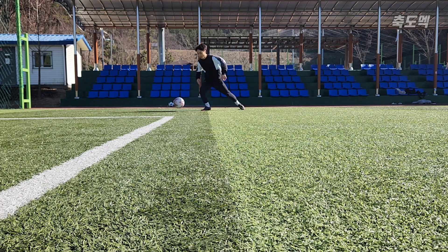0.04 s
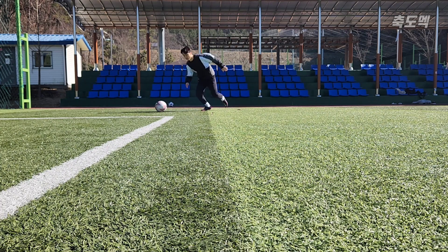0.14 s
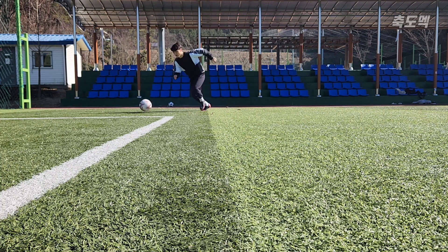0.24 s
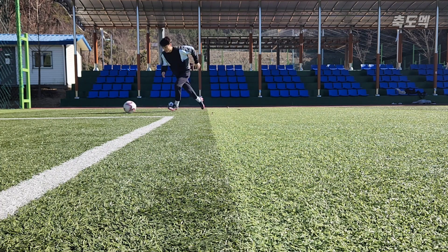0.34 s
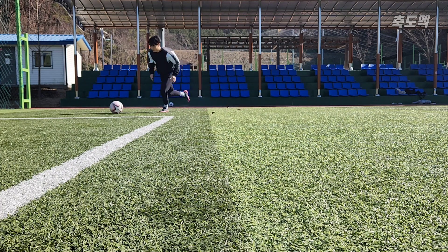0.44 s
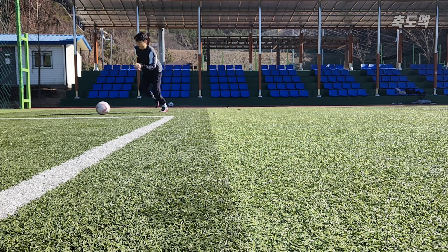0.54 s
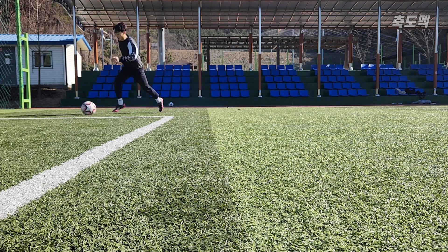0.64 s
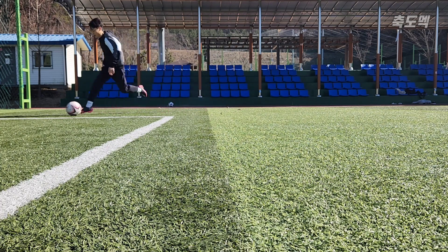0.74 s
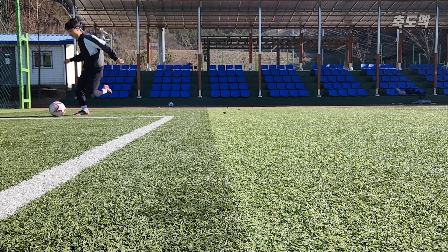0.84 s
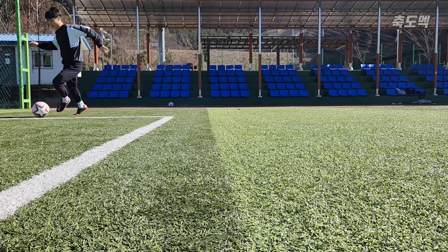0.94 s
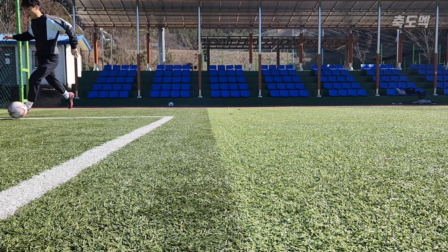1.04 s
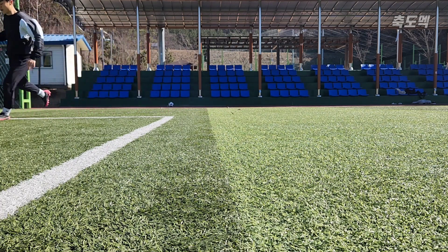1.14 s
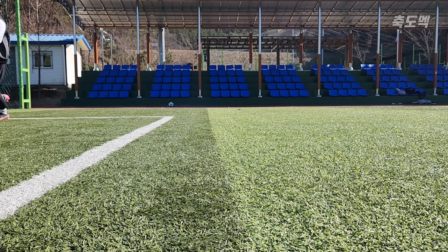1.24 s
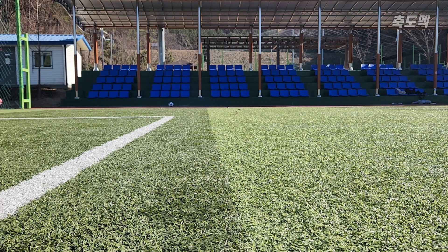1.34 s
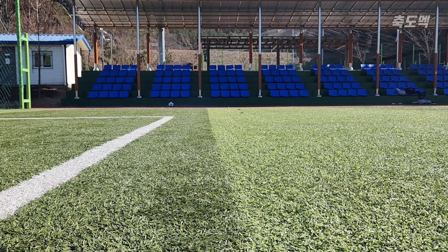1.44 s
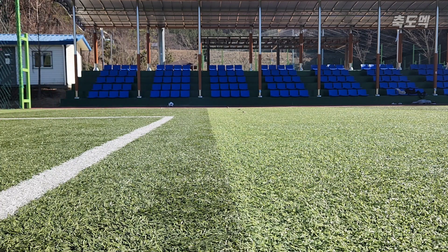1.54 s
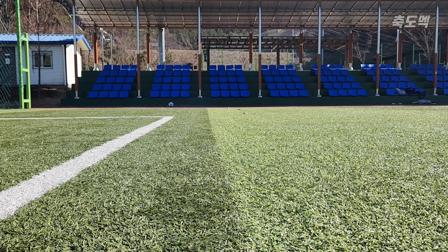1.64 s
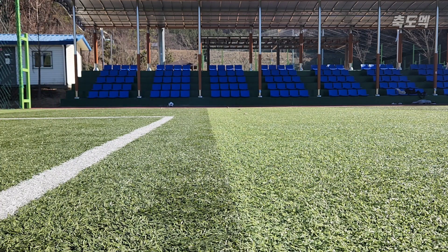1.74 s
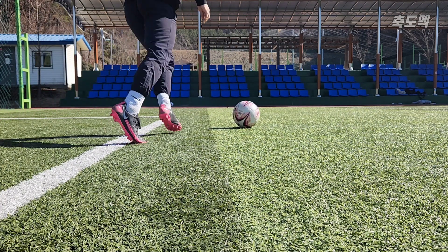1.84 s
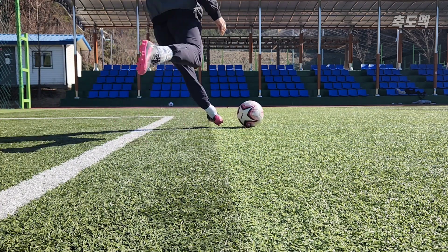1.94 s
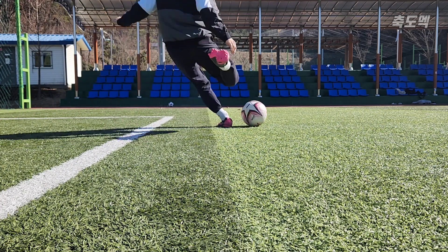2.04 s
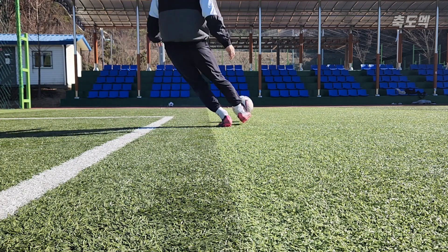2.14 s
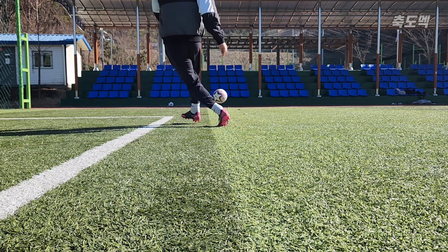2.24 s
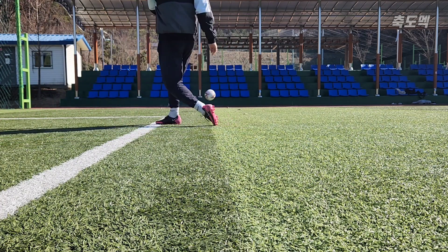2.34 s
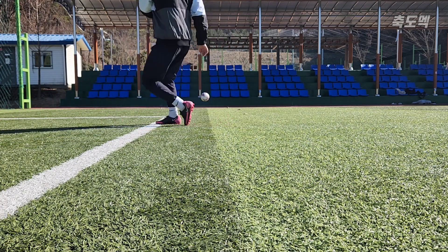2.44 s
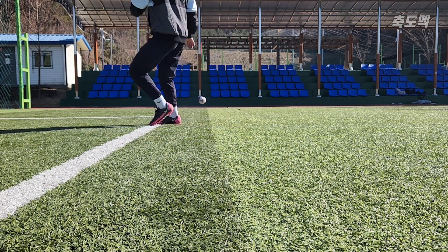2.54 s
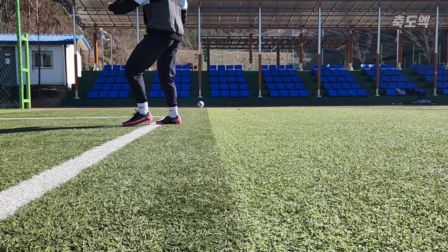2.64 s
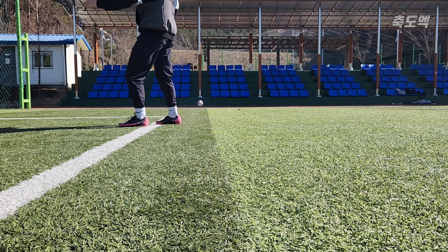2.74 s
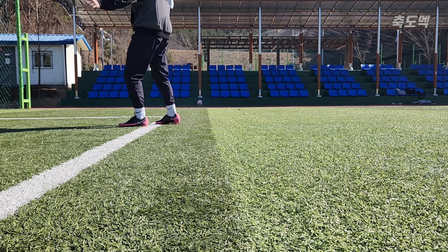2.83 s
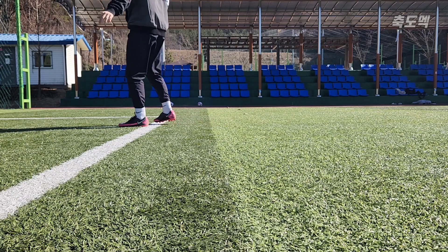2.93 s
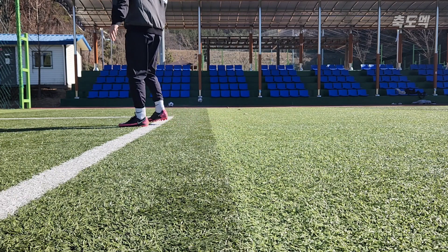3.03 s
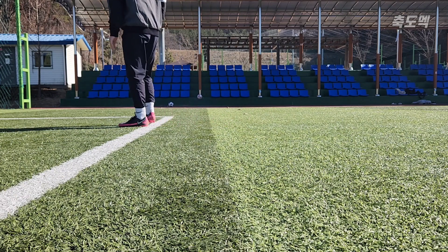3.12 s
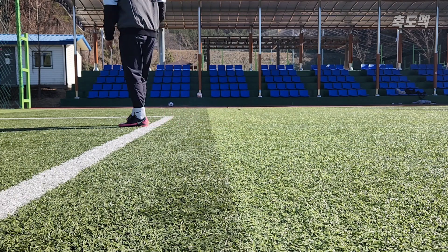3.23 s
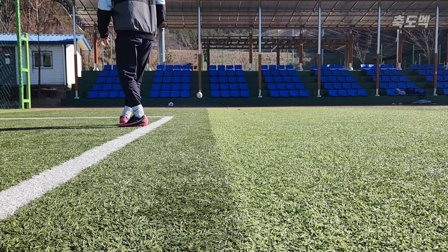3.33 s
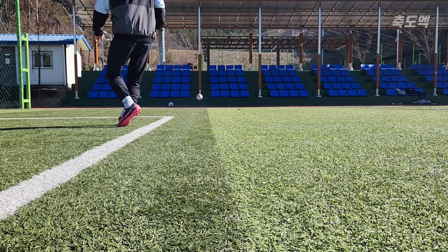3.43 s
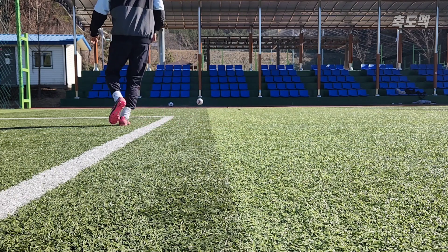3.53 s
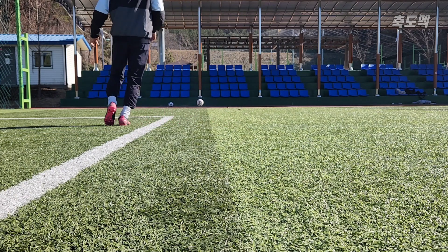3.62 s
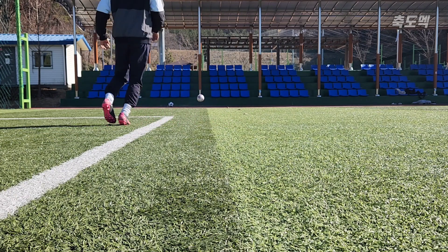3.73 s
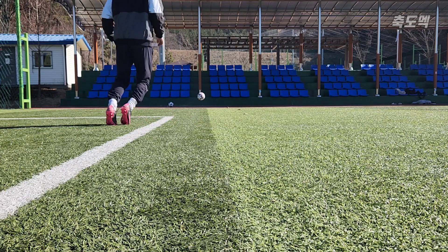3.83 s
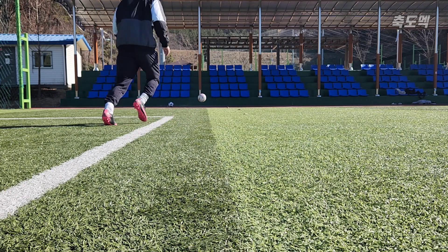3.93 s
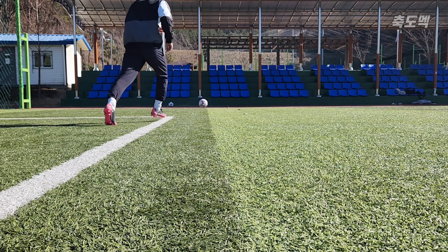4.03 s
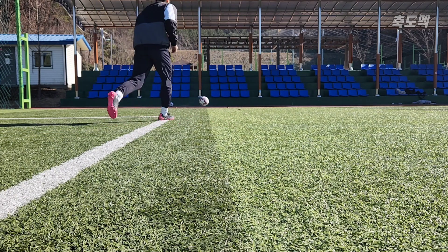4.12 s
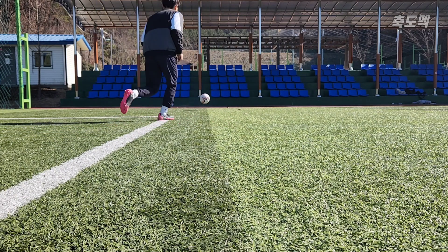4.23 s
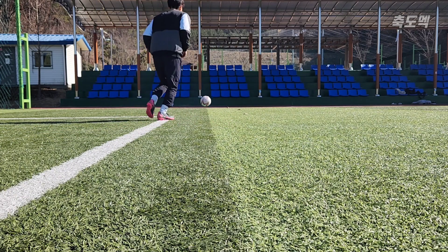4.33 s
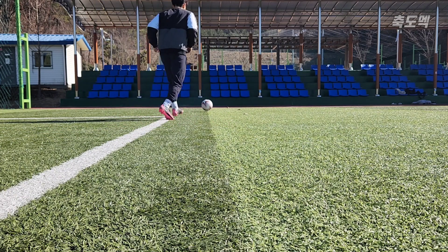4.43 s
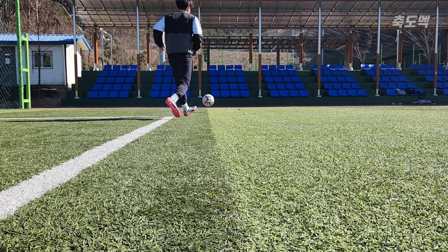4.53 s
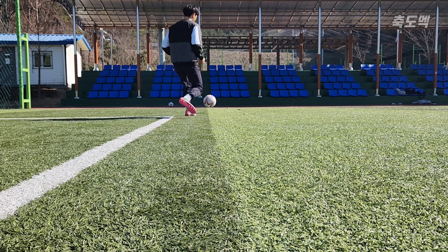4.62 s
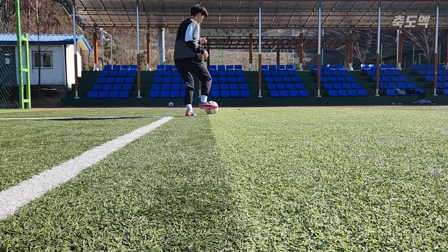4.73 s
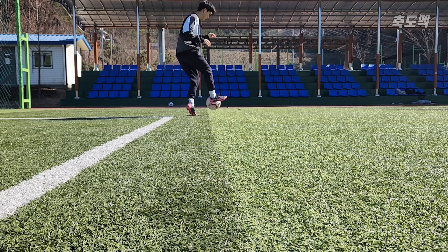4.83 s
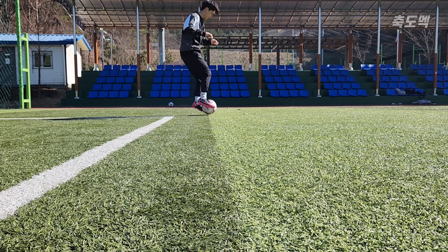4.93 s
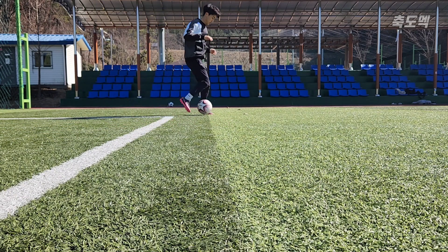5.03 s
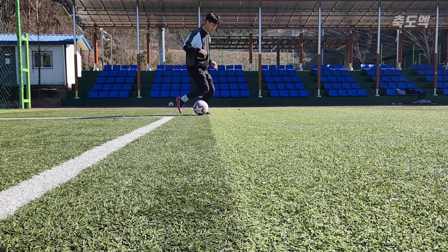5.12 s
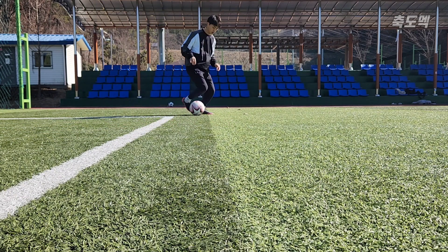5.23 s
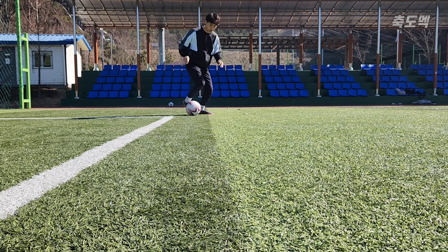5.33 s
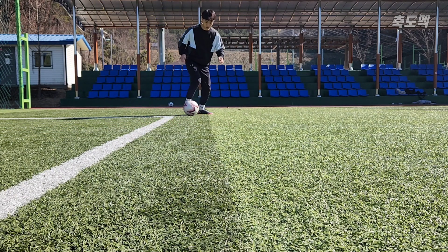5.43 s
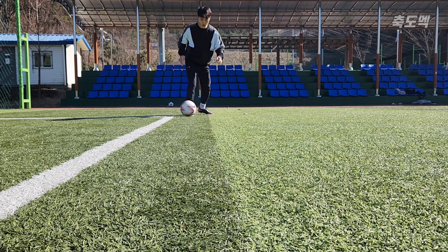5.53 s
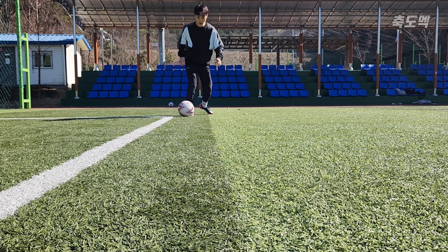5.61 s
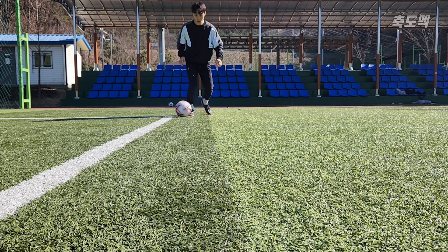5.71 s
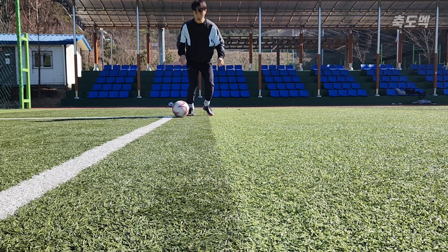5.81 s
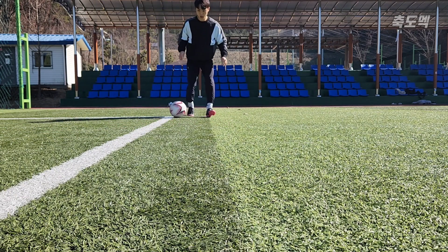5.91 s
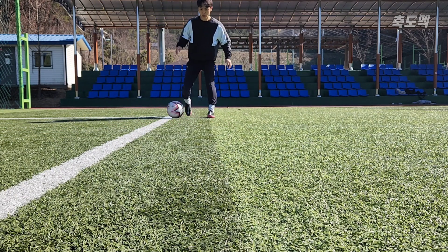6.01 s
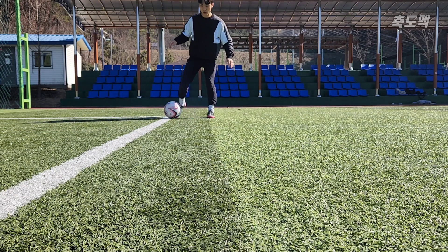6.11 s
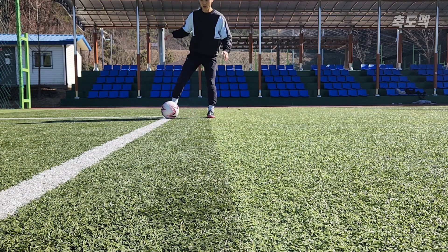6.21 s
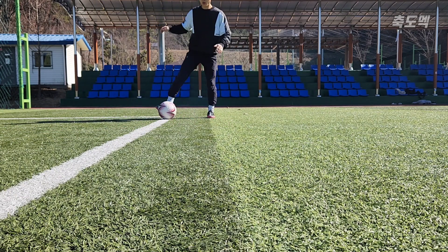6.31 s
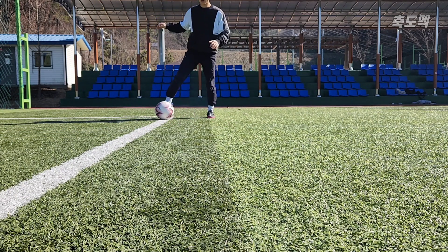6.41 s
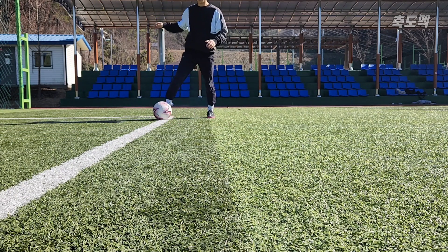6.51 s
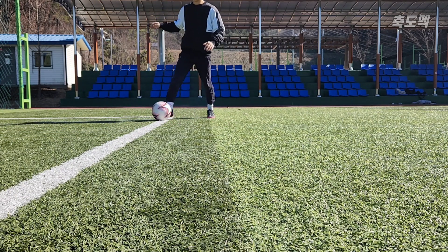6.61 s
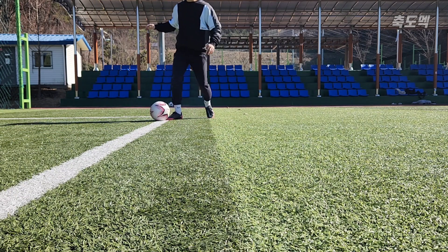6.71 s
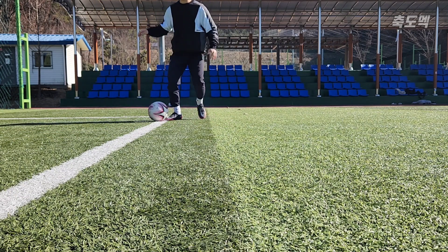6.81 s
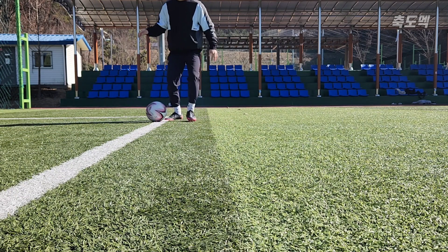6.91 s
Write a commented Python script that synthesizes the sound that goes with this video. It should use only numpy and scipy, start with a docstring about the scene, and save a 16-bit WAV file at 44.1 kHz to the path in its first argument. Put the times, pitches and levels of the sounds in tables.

```python
"""An artificial-turf pitch by a stand, picked up by a two-port microphone on the ground: ball practice.
Kicks are sagging sine thuds with rings and cracks; once the stand's seats and roof answer in decaying noise.
Studs crunch, thump and tick, and scuffs swish over plastic blades, all as shaped grainy noise and short sines.
Far traffic from the left is banded noise; a bird's sine notes, a faint rustle and a far drone lie behind it.
A limiter ducks on the loudest blows, and the peaks are rounded off.
"""
import sys
import numpy as np
from scipy import signal
from scipy.fft import rfft, irfft, next_fast_len
from scipy.io import wavfile
from scipy.ndimage import uniform_filter1d, minimum_filter1d, map_coordinates

SR = 44100
rng = np.random.default_rng(int(sys.argv[2]) if len(sys.argv) > 2 else 0)


def store_wav(level_fs):
    """Save 16-bit WAV to argv[1]."""
    pcm = np.round(np.clip(np.atleast_2d(level_fs), -1, 1) * 32767)
    wavfile.write(sys.argv[1], SR, pcm.T.astype(np.int16))


N = 306837
TIME = np.arange(N) / SR

# All levels are nominal: ahead of the small left-right trims, the microphone's treble and the limiter.

# Ball blows. Each row: start in seconds, level in dB, signed strength (+ push, - pull), settled pitch in Hz,
# early extra turns, thud length in turns, contact rise in seconds, squeezed-air pitch in Hz, its level in dB,
# skin ring in dB, crack in dB, crack centre in Hz, spray in dB under the crack. Inner levels are relative.
BALL_BLOWS = [(.0240, -15, -0.42, 70.5, 0.037, 0.99, 0.0032, 153, -1.5, -30, -46, 4940, -23.5),
              (1.1770, -18.5, 1, 103, 0.47, 1.05, 0.0012, 375, -8.5, -22, -17.5, 4060, -7),
              (2.2783, -1.5, -0.9, 103.6, 0.46, 1.06, 0.00027, 319, -14.5, -17.5, -22.5, 4740, -12.5),
              (3.2029, -2.5, -1.05, 150, 0.3, 1.38, 0.001, 312, -19, -25.5, -27.5, 2720, -23),
              (5.0286, -13.5, -1, 113, 0.32, 0.98, 0.00071, 551, -12.5, -21, -16, 6740, -23)]
# Ringing of the ball's skin. Each row: pitch in Hz, relative level in dB, time to fall 60 dB in seconds.
SKIN_RINGS = [(603, 8.5, 0.031), (780, -19, 0.071), (922, -39, 0.025)]
# Footfalls and soft touches. Each row: time in seconds, crunch level in dB, ground thump level in dB.
FOOTFALLS = [(0.325, -55, -56), (0.497, -56.5, -51), (0.593, -56, -50), (0.953, -55, -42),
             (1.083, -57, -47), (1.305, -48, -52), (1.41, -50.5, -54), (1.544, -53, -46),
             (1.64, -48.5, -40), (1.696, -52, -42), (2, -41, -43), (2.14, -38.5, -40), (2.18, -49.5, -51),
             (2.486, -48.5, -53), (2.529, -46.5, -53), (2.592, -48.5, -45), (2.676, -54, -54),
             (2.874, -50, -52), (3.14, -49, -47), (3.76, -47.5, -48), (4.234, -51.5, -39),
             (4.284, -50, -49), (4.714, -50.5, -49), (4.741, -52.5, -36), (4.9, -54.5, -52),
             (5.254, -53, -50), (6.099, -44.5, -54), (6.597, -57.5, -48), (6.761, -59, -54)]
# Lone low thumps through the ground. Each row: time in seconds, level in dB, pitch in Hz.
GROUND_THUMPS = [(1.219, -30.5, 61), (1.387, -31.5, 62), (2.026, -28.5, 59), (2.38, -31, 178),
                 (2.42, -28, 126), (2.505, -28.5, 103), (2.631, -28, 74.4), (2.871, -33, 73),
                 (3.734, -25, 131)]
# Stud ticks. Each row: start in seconds, peak level in dB, centre in Hz.
STUD_TICKS = [(0.0313, -39, 4700), (0.357, -49, 4200), (0.3752, -42.5, 1980), (1.935, -49.5, 2500),
              (2.119, -46.5, 1960), (2.876, -57, 2580), (3.216, -39, 5040), (5.513, -61, 6000)]
# Scuffs over the blades. Each row: time of peak in seconds, rms level there in dB, rise in seconds,
# centre in Hz, breadth in octaves.
BLADE_SCUFFS = [(0.066, -61.5, 0.035, 4600, 1.5), (0.391, -59, 0.039, 3880, 0.95),
                (0.63, -72.5, 0.052, 5960, 2.1), (.77, -70.5, 0.048, 5530, 0.53),
                (1.299, -61, 0.019, 3450, 1.14), (1.418, -61.5, 0.058, 3260, 1),
                (1.885, -58.5, 0.011, 2380, 0.3), (1.97, -69, 0.028, 3000, 1.9),
                (2.02, -54, 0.015, 9800, 3.1), (2.075, -64, 0.1, 1670, 0.61),
                (2.156, -51, 0.018, 6900, 3.9), (2.196, -61.5, 0.016, 2490, 0.98),
                (2.255, -58.5, 0.069, 4700, 2.4), (2.38, -71, 0.03, 900, 1.6), (2.54, -64, .065, 980, 0.97),
                (2.69, -67, 0.029, 8000, 1.5), (2.936, -58.5, 0.019, 7400, 4),
                (3.149, -62, 0.0054, 5950, 0.54), (3.182, -57.5, 0.02, 2500, 1.5),
                (3.777, -65, 0.016, 6500, 0.72), (3.832, -68.5, .018, 3340, 0.99),
                (4.03, -75, 0.076, 7450, 0.75), (4.44, -71.5, 0.092, 7000, 2.8),
                (4.809, -71, 0.052, 3570, 1.4), (4.875, -72, 0.032, 8100, .7),
                (5.76, -78.5, .037, 3470, 0.98), (5.885, -75.5, 0.03, 7000, 0.51),
                (6.108, -56.5, 0.02, 6750, 4.5), (6.15, -65.5, 0.035, 6000, 2.3)]
# The player runs off left and back. Each row: time in seconds, lead of the left port in ms.
PLAYER_PATH = [(0, 0.032), (.8, 0.12), (1.35, 0.29), (1.9, 0.14), (2.2, 0.03), (6.96, 0.049)]
# Tone of the rattling seats. Each row: frequency in Hz, relative level in dB per Hz.
SEAT_TONE = [(300, -40), (500, -20), (1200, -11.5), (2200, -13), (3900, -20.5), (7400, -18), (12000, -20.5),
             (16000, -25)]
# Tone of the sheet roof's boom. Each row: frequency in Hz, relative level in dB per Hz.
ROOF_TONE = [(24, -37), (40, 0), (156, 8.5), (226, -1.5), (275, -39), (408, -10), (600, -24), (780, -43),
             (1320, -120)]
# The boom's quick and slow parts. Each row: level in dB, time to fall 60 dB in seconds.
ROOF_DECAYS = [(-23.5, 0.17), (-34, 1.57)]
# The rattle returning from far left. Each row: centre in Hz, breadth in octaves, level in dB.
RETURN_BANDS = [(1700, .5, -61.5), (7800, 0.6, -63)]
# Far traffic. Each row: time in seconds, then the levels of the deep, drone and roar bands in dB.
ROAD_LEVELS = [(0.0, -38, -51, -48), (0.35, -44, -45, -49.5), (0.64, -45.5, -45, -51.5),
               (1.98, -45, -49, -50), (2.27, -46.5, -42, -48), (2.96, -49, -41, -51),
               (3.37, -49, -40, -48.5), (3.51, -49, -44.5, -51), (3.99, -49.5, -46, -50),
               (4.69, -47.5, -44, -52), (4.94, -49, -47, -50), (5.33, -51, -40, -50.5),
               (5.62, -58, -47, -49.5), (6.22, -49, -46, -49.5), (6.55, -45.5, -50, -50.5),
               (6.96, -42, -48, -45.5)]
# Tyre hiss. Each row: time in seconds, level in dB.
TYRE_LEVELS = [(0, -71), (1.6, -68.5), (2.3, -65), (4.0, -67), (6.96, -64)]
# Tone of the traffic at this distance. Each row: frequency in Hz, relative level in dB per Hz.
ROAD_TONE = [(15, -38), (25, -4.5), (81, -5), (133, -9), (164, -13), (194, -13.5), (224, -12), (264, -16.5),
             (461, -25), (556, -25), (604, -28), (1630, -39), (3500, -61), (4550, -100), (7700, -120)]
# How alike the traffic is at the two ports. Each row: frequency in Hz, likeness from 0 to 1.
ROAD_LIKENESS = [(25, 0.64), (60, 1), (130, 1), (300, 1), (700, 0.97), (1500, 0.56), (3000, 0.76)]
# The traffic's lean to the left. Each row: frequency in Hz, left over right in dB.
ROAD_LEAN = [(60, 1), (400, 1), (1300, 3.5), (15000, 18.5)]
# Dry leaves and cloth. Each row: time in seconds, level in dB.
RUSTLE_LEVELS = [(0, -72), (2.3, -72), (3.0, -77), (6.96, -79.5)]
# Tone of the leaves and cloth. Each row: frequency in Hz, relative level in dB per Hz.
RUSTLE_TONE = [(1500, -35), (2500, -15), (3500, -11.5), (5500, -14), (7500, -12.5), (11000, -18.5),
               (16000, -21.5)]
# Far bird notes. Each row: start in seconds, length in seconds, pitch in Hz, level in dB before fading.
BIRD_NOTES = [(5.442, 0.031, 6250, -79), (6.31, 0.13, 6100, -83)]
# A far engine. Each row: start of fade-in in seconds, pitch in Hz, width in Hz, full level in dB.
ENGINE_DRONES = [(5.0, 221, 4, -58.5), (5.0, 77, 4.6, -49)]
# The microphone's treble. Each row: frequency in Hz, gain in dB.
MIC_TREBLE = [(6000, 1), (7600, 2.5), (8800, 1.5), (9800, -5), (11000, -1), (13000, -3), (16000, 0)]

# Ball: slap under the thud; echo level at a 0 dB blow and its growth in dB per dB of blow
SLAP_DB, ECHO_DB, ECHO_GROWS = -24.5, -41, 0.24
# Steps: an ordinary crunch level, its length and centre, and how both grow with each dB above it
USUAL_DB, STEP_S, STEP_S_PER_DB = -50, 0.036, 0.0008
CRUNCH_HZ, CRUNCH_HZ_PER_DB = 546, 8
FALL_OVER_RISE = 1.36  # a swish falls more slowly than it rises
# Stand: onset of the shaking, seat rattle and its cut-off, roof cut-off, then the returning rattle
STAND_S, STAND_RISE_S = 3.212, 0.014
RATTLE_DB, RATTLE_T60_S, RATTLE_STOPS_S, ROOF_STOPS_S = -45, 0.6, 0.28, 0.45
RETURN_S, RETURN_RISE_S, RETURN_LEAD_MS = 3.415, 0.043, 0.47
TOP_HZ = 15800  # upper edge of the recorded band


def ball():
    """The squeezed ball springs back: a sagging thud, air and skin rings, slap, crack, crumbs and late echo."""
    out, t = np.zeros((2, N)), np.arange(SR // 2) / SR
    for (s, db, sign, hz, turns, lasts, rise, air_hz, air_db, skin_db,
         crack_db, crack_hz, spray_db) in BALL_BLOWS:
        contact = 1 - np.exp(-t / abs(rise))
        phase_turns = hz * t + turns * (1 - np.exp(-t / 0.0015))  # pitch starts high and sags
        thud = sign * np.sin(2 * np.pi * phase_turns) * np.exp(-(t * hz / lasts) ** 4)
        air = sign * np.sin(2 * np.pi * air_hz * t) * np.exp(-(t / 0.0082) ** 2)
        ring = sum(amp(level - 60 * t / t60) * sign * np.sin(2 * np.pi * f * t)
                   for f, level, t60 in SKIN_RINGS)

        rough = filtered(rng.standard_normal(len(t)),
                         lambda f: hump(f, 431, 0.64) + 0.049 * hump(f, 1950, 0.63))
        slap = unit(rough) * np.exp(-(t / 0.018) ** 2)

        snap = t / 0.0009 * np.exp(1 - t / 0.0009)  # peaks at 0.9 ms
        spray = amp(spray_db - 60 * t / 0.07)  # flying crumbs
        burst = pair(grit(len(t), 1.0), 0.11, 0) * (snap + spray)
        crack = filtered(burst, lambda f: hump(f, crack_hz, 1.14) / (1 + (f / 13000) ** 4))

        body = thud + amp(air_db) * air + amp(skin_db) * ring + amp(SLAP_DB) * slap
        blow = contact * body + amp(crack_db) * crack
        add(out, s, amp(db) * blow)
        add(out, s, amp(ECHO_DB + ECHO_GROWS * db) * late_echo(blow, t))
    return out * amp([[.3], [-.3]])


def late_echo(blow, t):
    """The far stand answers late: the blow convolved with dull noise that builds up, then fades out."""
    dull = filtered(rng.standard_normal(len(t)), lambda f: 1 / np.sqrt(1 + (f / 1200) ** 4))
    fade = amp(-60 * t / 5.7) * np.cos(np.pi * t / (2 * t[-1]))
    late = dull * fade * (1 - np.exp(-(t / 0.073) ** 4))
    return signal.fftconvolve(blow, late[None] / np.linalg.norm(late), axes=1)


def stand():
    """Seats and sheet roof rattle and boom after the ball strikes, arriving from all along the stand."""
    t = np.maximum(TIME - STAND_S, 0)
    start = 1 - np.exp(-(t / STAND_RISE_S) ** 2)

    def dying(db, t60, stop):
        """Exponential decay that is cut off around the stop time."""
        return amp(db - 60 * t / t60) * np.exp(-(t / stop) ** 8)

    rattle = unit(filtered(grit(N, 1.4), lambda f: amp(along(SEAT_TONE, f))))
    shake = amp(1.6 * wobble(60))
    seats = dying(RATTLE_DB, RATTLE_T60_S, RATTLE_STOPS_S) * shake * rattle

    boom = unit(filtered(rng.standard_normal((2, N)), lambda f: amp(along(ROOF_TONE, f))))
    roof_decay = sum(dying(db, t60, ROOF_STOPS_S) for db, t60 in ROOF_DECAYS)
    roof = roof_decay * pair(boom, 0.97, 0.05)

    out = start * (seats + roof)
    for hz, octaves, db in RETURN_BANDS:
        out = swish(out, RETURN_S, db, RETURN_RISE_S, hz, octaves, RETURN_LEAD_MS)
    return out


def feet():
    """Each footfall is a dull crunch of studs plus a push into the ground; lone thumps and ticks join in."""
    out, t = np.zeros((2, N)), np.arange(SR // 8) / SR
    both = np.ones((2, 1))  # the same at both ports

    def push(hz):
        """About two turns of a sine under a smooth swell."""
        return -np.sin(2 * np.pi * hz * t) * np.sin(np.pi * np.minimum(t * hz / 2.13, 1)) ** 2

    for s, db, thump_db in FOOTFALLS:
        # louder steps last longer and are brighter
        progress = t / (STEP_S + STEP_S_PER_DB * (db - USUAL_DB))
        hz = CRUNCH_HZ + CRUNCH_HZ_PER_DB * (db - USUAL_DB)
        crunch = unit(filtered(
            grit(len(t), 1.7),
            lambda f: hump(f, hz, 0.69) / (1 + (f / 1500) ** 4) + 0.055 * hump(f, 2100, 0.83)))
        weight = np.sin(np.pi * np.minimum(progress, 1) ** 0.65) ** 2  # rolls on and off the studs
        add(out, s - 0.003, amp(db) * pair(crunch, 0.74, 0.12) * weight)
        add(out, s, amp(thump_db) * push(120) * both)
    for s, db, hz in GROUND_THUMPS:
        add(out, s - 0.004, amp(db) * push(hz) * both)
    for s, db, hz in STUD_TICKS:
        click = rng.standard_normal(len(t)) * amp(-60 * t / 0.009)
        tick = filtered(click, lambda f: hump(f, hz, 1.2) * (f > 800))
        add(out, s, amp(db) * tick / np.abs(tick).max() * both)
    return out * amp([[.7], [-.7]])


def scuffs():
    """Plastic blades flick back under boot and ball: grainy swishes heard from where the player is."""
    out, (lead_ms,) = np.zeros((2, N)), curves(PLAYER_PATH)
    for s, db, rise, hz, octaves in BLADE_SCUFFS:
        out = swish(out, s, db, rise, hz, octaves, lead_ms[round(s * SR)])
    return out * amp([[1.1], [-1.1]])


def swish(track, s, db, rise, hz, octaves, lead_ms):
    """Dense grains of banded noise under a swell that peaks at s."""
    half = SR // 4
    t = np.arange(-half, half) / SR
    swell = np.exp(-(t / np.where(t < 0, rise, rise * FALL_OVER_RISE)) ** 2)

    def tone(f):
        low_cut = 1 + (500 / (f + 1)) ** 4
        return hump(f, hz, octaves) * (1 + 0.27 * hump(f, 8500, 0.04)) / low_cut

    blades = unit(filtered(grit(len(t), 1.61), tone))
    sound = amp(db) * pair(blades, 0.58, lead_ms) * swell
    out = np.zeros_like(track)
    skip = max(0, half - round(s * SR))  # drop what would fall before the start
    add(out, max(0, s - half / SR), sound[:, skip:])
    return track + out


def road():
    """Far traffic from the left: four bands of noise, each swelling on its own."""
    deep_db, drone_db, roar_db = curves(ROAD_LEVELS)
    hiss_db, = curves(TYRE_LEVELS)
    # level in dB, lower and upper edge in Hz, depth of the swelling in dB
    bands = [(deep_db, 0, 60, 1.5), (drone_db, 60, 150, 1.5),
             (roar_db, 150, 900, 1.2), (hiss_db, 900, 20000, 0.7)]
    out = np.zeros((2, N))
    for db, low, high, lumps_db in bands:
        def tone(f):
            edges = (1 + (low / (f + 1)) ** 8) * (1 + (f / high) ** 8)
            return amp(along(ROAD_TONE, f)) / np.sqrt(edges)
        noise = unit(filtered(rng.standard_normal((2, N)), tone))
        out += amp(db + lumps_db * (wobble(3.9) + wobble(7.0))) * noise
    out = pair(out, lambda f: along(ROAD_LIKENESS, f), 0.4)
    return filtered(out, lambda f: amp(along(ROAD_LEAN, f) * np.array([[.5], [-.5]])))


def rustle():
    """A faint treble rustle, patchy in time and pitch, nearly unrelated at the two ports."""
    spectrum = signal.stft(grit(N, 1.6), nperseg=512)[2]
    field = rng.standard_normal(spectrum.shape[1:])
    field = uniform_filter1d(field, size=8, axis=0)  # across frequency
    field = uniform_filter1d(field, size=10, axis=1)  # across time
    patches = signal.istft(spectrum * amp(1.8 * unit(field)), nperseg=512)[1][:, :N]
    noise = unit(filtered(patches, lambda f: amp(along(RUSTLE_TONE, f))))
    flutter_db = 0.8 * wobble(9)
    return amp(curves(RUSTLE_LEVELS)[0] + flutter_db) * pair(noise, 0.063, 0) * amp([[1.8], [-1.8]])


def bird():
    """Thin far-off notes: sines of steady pitch that swell in and fade."""
    out = np.zeros(N)
    for s, length, hz, db in BIRD_NOTES:
        t = np.arange(round(length * SR)) / SR
        swell = np.sqrt(np.sin(np.pi * t / length)) * np.exp(-t / 0.095)
        add(out, s, amp(db) * np.sin(2 * np.pi * hz * t) * swell)
    return out


def hum():
    """A far engine: noise so narrow that it sounds as wavering drones, fading in."""
    out = np.zeros(N)
    for s, hz, width_hz, db in ENGINE_DRONES:
        drone = unit(filtered(rng.standard_normal(N),
                              lambda f: np.exp(-0.5 * ((f - hz) / width_hz) ** 2)))
        out += amp(db) * drone * np.clip((TIME - s) / 0.37, 0, 1)
    return out


def amp(db):
    """Decibels to gain."""
    return 10 ** (np.asarray(db) / 20)


def unit(x):
    """Scaled to rms 1."""
    return x / np.sqrt(np.mean(x ** 2) + 1e-20)


def along(points, hz):
    """Value at each frequency, read between (Hz, value) points on a log axis."""
    f, v = np.transpose(points)
    return np.interp(np.log(hz + 1), np.log(f + 1), v)


def curves(rows):
    """One value per sample for each column after the time."""
    s, *cols = np.transpose(rows)
    return [np.interp(TIME, s, c) for c in cols]


def wobble(rate):
    """A smooth random curve, rate knots a second."""
    knots = rng.standard_normal(int(N * rate / SR) + 4)
    return map_coordinates(knots, [TIME * rate])


def filtered(x, response):
    """x with its spectrum multiplied by a response of frequency."""
    m = next_fast_len(x.shape[-1] + 4096)
    spectrum = rfft(x, m) * response(np.fft.rfftfreq(m, 1 / SR))
    return irfft(spectrum, m)[..., :x.shape[-1]]


def hump(hz, centre_hz, octaves):
    """A bell-shaped band on a log axis."""
    return np.exp(-0.5 * (np.log2((hz + 1) / centre_hz) / octaves) ** 2)


def pair(two, alike, lead_ms):
    """Two unrelated signals mixed to a left-right likeness (number or function of Hz); the left leads."""
    def ports(hz):
        likeness = alike(hz) if callable(alike) else np.full_like(hz, alike)
        turn = np.arccos(np.clip(likeness, 0, 1)) / 2
        return np.array([np.cos(turn), np.sin(turn)])

    def lead(hz):
        # half the lead on each port, in opposite directions
        return np.exp(1j * np.pi * hz * lead_ms / 1000 * np.array([[1], [-1]]))

    mid, side = filtered(two, ports)
    return filtered(np.array([mid + side, mid - side]), lead)


def add(track, s, sound):
    """Lay a sound into a track from time s."""
    spot = track[..., round(s * SR):][..., :sound.shape[-1]]
    spot += sound[..., :spot.shape[-1]]


def grit(length, spiky_db):
    """Two strands of grainy noise: a new random loudness every 40 samples, about a millisecond."""
    size = np.minimum(rng.exponential(1, (2, length // 40 + 1)), 3.5)
    size = np.repeat(size, 40, axis=1)[:, :length]
    return unit(rng.standard_normal((2, length)) * amp(spiky_db * size))


def scene():
    """Everything at the microphone ports."""
    return ball() + stand() + feet() + scuffs() + road() + rustle() + bird() + hum()


def record(dry):
    """The port colours the treble, a limiter ducks the loudest blows, peaks round off, the band ends steeply."""
    port = filtered(dry, lambda hz: amp(along(MIC_TREBLE, hz)))
    peak_db = 20 * np.log10(np.abs(port).max(axis=0) + 1e-9)
    over_db = np.maximum(peak_db + 0.83, 0)  # excess above -0.83 dB
    held_db = -minimum_filter1d(-over_db, size=2400, origin=1199)  # highest of the last 54 ms
    duck_db = signal.lfilter([0.0012], [1, 0.0012 - 1], held_db)  # eases in and out, about 19 ms
    x = port * amp(-2.5 * duck_db)
    x = x / (1 + np.abs(x / 1.05) ** 8) ** (1 / 8)  # soft ceiling
    return filtered(x, lambda hz: hz < TOP_HZ)


dry = scene()
out = record(dry)
store_wav(out)
```